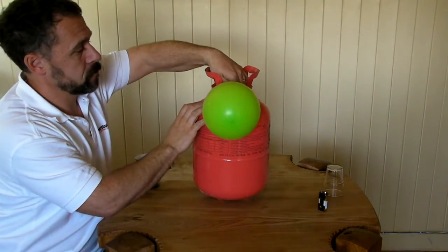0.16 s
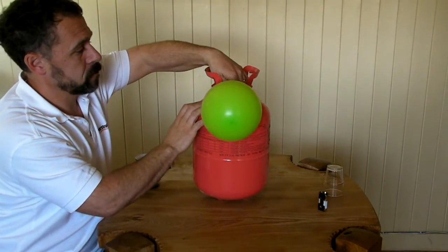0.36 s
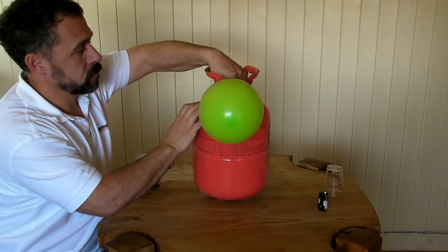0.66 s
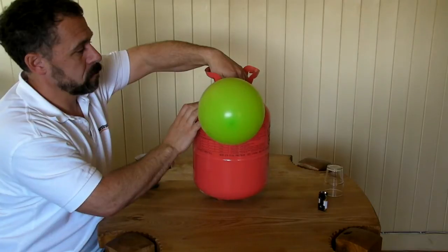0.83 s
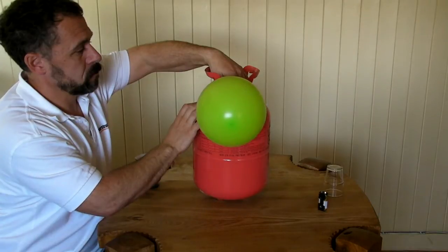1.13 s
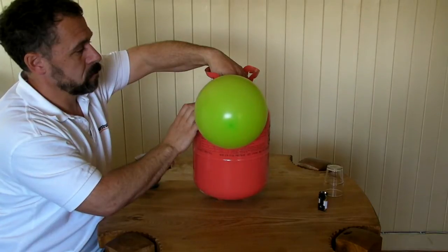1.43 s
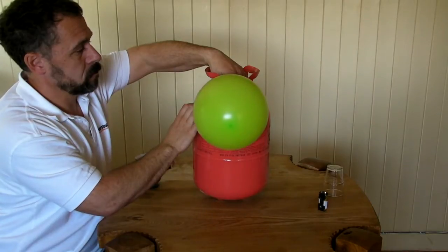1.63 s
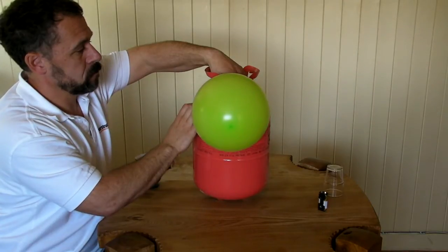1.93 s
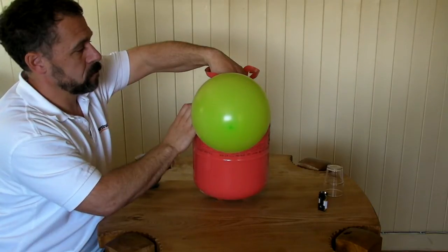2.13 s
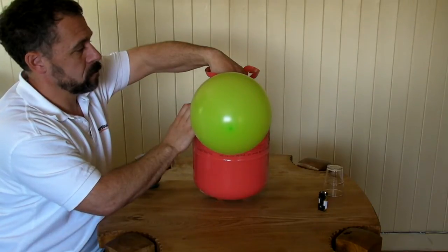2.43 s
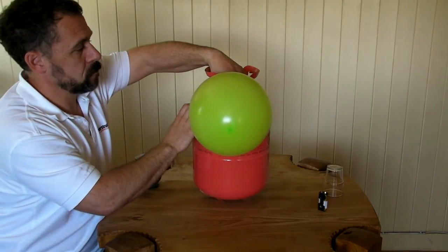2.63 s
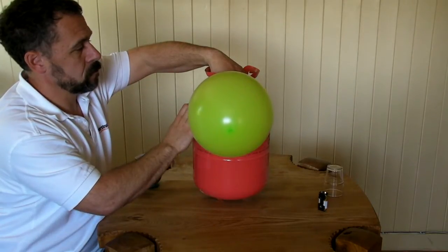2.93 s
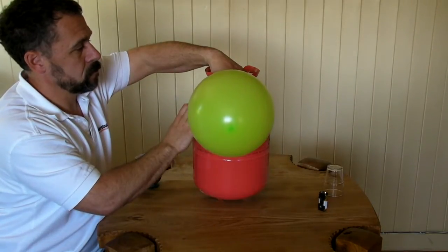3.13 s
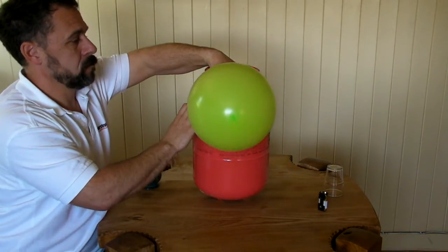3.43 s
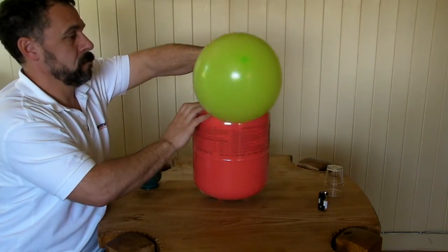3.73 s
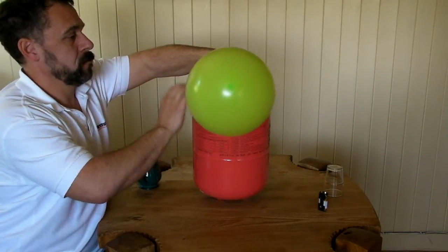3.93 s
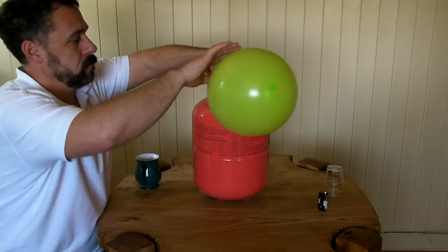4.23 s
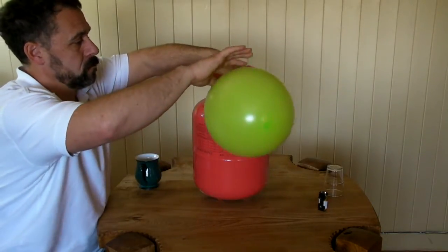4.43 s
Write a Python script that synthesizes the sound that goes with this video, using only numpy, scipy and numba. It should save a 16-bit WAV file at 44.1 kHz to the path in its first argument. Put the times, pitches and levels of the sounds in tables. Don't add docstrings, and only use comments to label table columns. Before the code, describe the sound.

In a small panelled room, a canister blows gas into a balloon: a loud, bright hiss with a thin high whistle, its tones sinking and softening as the balloon swells. Low skin flutter and canister rumble run beneath. The valve closes, leaving quiet device hiss, tiny ticks and finger taps, then two brief latex rubs and a new burst of gas at the end. Stereo pocket camera about two metres away.

```python
import sys
import numpy as np
from scipy import signal
from scipy.fft import rfft, irfft
from scipy.io import wavfile
from scipy.ndimage import uniform_filter1d
from numba import njit

SR = 44100
rng = np.random.default_rng(int(sys.argv[2]) if len(sys.argv) > 2 else 0)


def inscribe(sig):
    pcm = np.round(np.clip(np.atleast_2d(sig).T, -1, 1) * 32767)
    wavfile.write(sys.argv[1], SR, pcm.astype(np.int16))


def invert_db(x):
    u = np.asarray(x, float) / 20
    return 10 ** u


N = 202307
TIME = np.arange(N) / SR
FREQ = np.arange(N // 2 + 1) * SR / N + 1e-9

# time in seconds, jet level in dB.
VALVE_OPEN = [
    [(0.0, -23), (0.45, -26), (0.8, -24.5), (1.3, -26.5), (1.8, -28), (2.3, -31), (2.7, -32), (3.4, -32.5),
     (3.6, -36), (3.67, -41.5), (3.75, -54.5), (3.84, -93), (3.9, -100)],
    [(4.45, -101), (4.49, -65), (4.546, -49.5), (4.59, -36.5)],
]
FULL_FLOW_DB = -30


def unit(x):
    return x / np.sqrt(np.mean(x ** 2))


def noise():
    return rng.standard_normal(N)


def colour(x, points):
    hz, db = np.transpose(points)
    gain = invert_db(np.interp(np.log(FREQ), np.log(hz), db))
    return irfft(rfft(x) * gain, N)


@njit
def svf(x, hz, width):
    out, band, low = np.empty(len(x)), 0., 0.
    for i in range(len(x)):
        g, k = np.tan(np.pi * hz[i] / SR), width[i] / hz[i]
        v = (band + g * (x[i] - low)) / (1 + g * (g + k))
        band, low = 2 * v - band, low + 2 * g * v
        out[i] = k * v
    return out


def ring(x, modes, scale=1., blur=1.):
    one = np.ones(N)
    out = np.zeros(N)
    for hz, width, db in modes:
        centre = np.minimum(one * hz * scale, .45 * SR)
        out += invert_db(db) * svf(x, centre, one * width * blur)
    return out


def walk(rate):
    k = int(SR / rate)
    steps = np.repeat(rng.standard_normal(N // k + 1), k)
    return unit(uniform_filter1d(uniform_filter1d(steps, k), k)[:N])


def bumps(rows):
    return sum(db * np.exp(-(2 * (TIME - s) / length) ** 2) for s, length, db in rows)


def valve_flow():
    out = np.full(N, -120.)
    for rows in map(np.array, VALVE_OPEN):
        on = (TIME >= rows[0, 0]) & (TIME <= rows[-1, 0])
        out[on] = np.interp(TIME[on], rows[:, 0], rows[:, 1])
    return out


def valve_jet():
    # frequency in Hz, level in dB per Hz.
    jet_colour = [(330, -29.5), (560, -4), (793, -7.5), (886, -2), (1090, -3.5), (1500, -3), (1570, -1.5),
                  (2510, -4), (2850, -3.5), (3400, -6.5), (4300, -6.5), (6030, -5), (7960, -9),
                  (8420, -6.5), (10800, -1), (12300, -6.5), (15500, -14.5)]
    return unit(colour(noise(), jet_colour)) * invert_db(valve_flow() - 1.5 + 0.21 * walk(11.0))


def throat_whistle():
    # frequency in Hz, width in Hz, level in dB.
    throat_modes = [(10800, 1900, 0), (10200, 250, -7), (10620, 300, -5)]
    blow_db = -29.5 + 0.54 * (valve_flow() - FULL_FLOW_DB)
    throat = ring(noise(), throat_modes, 1 + .004 * walk(6))
    whistle = unit(ring(throat, throat_modes[:1])) * invert_db(blow_db - 6.5 + .9 * walk(8))
    spurt_s, spurt_length_s, spurt_hz, spurt_db = 2.495, 0.059, 10700, -31.5
    bell = np.exp(-(2 * (TIME - spurt_s) / spurt_length_s) ** 2)
    spurt = unit(ring(throat, [(spurt_hz, 200, 0)])) * invert_db(spurt_db) * bell
    return whistle, spurt


def gas_ball(jet, whistle):
    # frequency in Hz, width in Hz, level in dB,
    # extra pitch change per second once the ball lengthens.
    ball_modes = [(4300, 560, 3.5, -.02), (6300, 560, -.5, -.02), (8320, 420, 4, -.038),
                  (10040, 430, 3.5, -.034), (11350, 450, 1, -.004), (12850, 650, -3, 0),
                  (14500, 650, -2, -.01), (16000, 500, -1, 0), (17600, 600, -2, 0), (19300, 700, -3, 0),
                  (20900, 800, -3, 0), (22500, 900, -3, 0)]
    # frequency in Hz, level in dB.
    breathing = [(2000, 0.5), (3000, -1.5), (3900, 3.5), (4600, -4.5), (5200, -4.5), (7000, -12)]
    # frequency in Hz, width in Hz, level
    # in dB.
    nozzle_modes = [(2560, 600, -2), (4480, 220, -6)]
    # frequency at the start in Hz, width in Hz, depth from 0 to 1.
    troughs = [(5740, 320, 0.4), (9400, 610, 0.4), (11800, 980, 0.8), (13600, 500, .5), (15600, 500, .5),
               (17100, 600, .5), (18700, 600, .4)]

    fill_per_s, emptying_s = .79, 5.
    volume = 1 + fill_per_s * emptying_s * (1 - np.exp(-TIME / emptying_s))
    shrink = volume ** (-1 / 3)
    scale = shrink * (1 + 0.004 * walk(5.5))
    blur = shrink * (1 + 0.39 * TIME)

    def swelling_ring(x, rows, since):
        out = np.zeros(N)
        for hz, width, db, sinking in rows:
            lengthened = 1 + sinking * np.maximum(TIME - since, 0)
            out += ring(x, [(hz, width, db)], scale * lengthened, blur) * invert_db(1.4 * walk(5))
        return out

    pear_s = .8
    source = jet + whistle
    first = swelling_ring(jet, ball_modes[:1], pear_s) * invert_db(-5 * TIME - 2.0)
    second = swelling_ring(source, ball_modes[1:2], 0.)
    upper = swelling_ring(source, ball_modes[2:], pear_s) * invert_db(-2 * TIME)

    leak = invert_db(np.minimum(-16 + 7 * TIME, -3.5))
    nozzle = ring(jet, nozzle_modes) * np.clip(TIME / 2.24, 0, 1) ** 2
    below = invert_db(-3.5) * colour(jet, breathing)
    rush = first + second + upper + leak * (source + nozzle) + below
    for centre, width, depth in troughs:
        rush = rush - depth * np.exp(-TIME / .8) * ring(rush, [(centre, width, 0)], scale)
    return rush


def balloon_skin():
    # frequency in Hz, width in Hz, level in dB.
    skin_modes = [(235, 36, -1.5), (327.5, 38, 0.5)]
    # time in seconds, pitch in Hz, level in dB.
    drone_path = [(0, 370, 0.5), (.25, 363, -2), (.55, 363, 0.5), (.9, 379, 1.5), (1.05, 430, -1),
                  (1.4, 440, -2), (1.95, 430, -1.5), (2.08, 516, -1), (2.4, 535, 4), (2.55, 425, -3.5),
                  (4.59, 356, -1)]
    # time in seconds, length in seconds, strength in dB.
    shudders = [(0.12, .08, 7), (0.3, 0.12, 8.5), (0.46, 0.14, 3.5), (0.6, 0.12, 7), (0.83, 0.067, 6.5),
                (0.95, 0.039, 13), (1.06, 0.05, 9.5), (1.36, 0.22, 8), (1.5, 0.15, 6.5), (1.68, 0.079, 13),
                (1.84, 0.13, 9), (2.11, 0.033, 17), (2.22, 0.11, 17.5), (2.42, 0.051, 8), (2.68, 0.048, 4),
                (2.86, 0.058, 20), (3.12, 0.12, 11), (3.24, 0.12, 15), (3.43, 0.066, 17)]
    skin_db = valve_flow() - FULL_FLOW_DB - 3 * TIME
    shudder = bumps(shudders)
    hum = unit(ring(ring(noise(), skin_modes), skin_modes))
    hum = hum * invert_db(-58.5 + skin_db + shudder + 1.8 * walk(9.14))

    s, pitch, strength = np.transpose(drone_path)
    hz = np.interp(TIME, s, pitch)
    swell = np.interp(TIME, s, strength)
    drone = unit(svf(svf(noise(), hz, 0.13 * hz), hz, 1.5 * hz))
    drone_db = -49.5 + swell + skin_db + 2 * TIME + 0.5 * shudder + 1.5 * walk(8.6)
    return hum + drone * invert_db(drone_db)


def gas():
    jet = valve_jet()
    whistle, spurt = throat_whistle()
    return gas_ball(jet, whistle) + balloon_skin() + spurt


def camera_hiss():
    # frequency in Hz, level in dB per Hz.
    hiss_colour = [(18, -50), (45, -26), (140, -0.5), (341, 3.5), (450, 2.5), (656, 2), (1230, -0.5),
                   (2130, -2), (4300, -3), (4480, -7.5), (7860, -14), (9190, -13.5), (15500, -19)]
    shared, left, right = (unit(colour(noise(), hiss_colour)) for _ in range(3))
    duck_db = -8 * np.clip((valve_flow() + 52) / 15, 0, 1)
    return (0.59 * shared + np.array([left, right])) * invert_db(-48.5 - 2.5 + duck_db)


def rumble():
    # time in seconds, length in seconds,
    # level in dB.
    neck_shifts = [(.1, .1, -3), (.27, .08, -2), (.45, .14, 8), (.68, .12, 7), (.85, .06, 3), (1.22, .06, 5),
                   (1.4, 0.12, 8), (1.57, .06, 5), (1.68, 0.054, 5), (1.83, 0.16, 9), (2.17, 0.11, 11.5),
                   (2.4, .05, 6), (2.6, .06, -2), (2.85, .05, 18), (3.1, .08, 0), (3.22, .07, 20),
                   (3.45, 0.11, 8)]
    # time in seconds, length in seconds, level in dB.
    grips = [(3.72, .1, 7), (3.85, 0.086, 6), (4.02, .1, 10), (4.13, .03, 4), (4.25, 0.11, 15),
             (4.5, 0.19, 20)]
    flow = valve_flow()
    canister_db = -68 + flow - FULL_FLOW_DB - 3.5 * TIME + bumps(neck_shifts)
    gas_off = np.clip((-36 - flow) / 5, 0, 1)
    shake = invert_db(canister_db) + invert_db(-72.5 + bumps(grips)) * gas_off
    low = [(20, -32), (50, -12), (100, 7.5), (170, 0.0), (260, -28.5)]  # (Hz, dB)
    shared, apart = (unit(colour(noise(), low)) for _ in range(2))
    return (shared + 0.43 * np.outer([1, -1], apart)) * shake * invert_db(1.8 * walk(26))


def taps():
    # time in seconds, level in dB, pitch in Hz, decay in seconds.
    contacts = [(3.668, -53, 170, .012), (3.828, -55, 430, .045), (4.0, -57, 610, .035),
                (4.008, -52, 170, .012), (4.212, -50, 68, .04), (4.22, -39, 383, .006),
                (4.225, -41, 683, .013), (4.228, -44, 1034, .01), (4.234, -42, 912, .009),
                (4.238, -44, 530, .016), (4.262, -50, 1400, .015), (4.3, -60, 101, .035),
                (4.45, -52, 113, .02), (4.473, -48, 900, .016), (4.479, -48, 690, .015),
                (4.486, -46, 900, .012), (4.497, -42, 209, .035), (4.5, -49, 775, .022),
                (4.512, -49, 2050, .01), (4.549, -54, 217, .04), (4.56, -50, 1750, .014),
                (4.565, -49, 900, .016), (4.572, -49, 1250, .012)]
    out = np.zeros(N)
    for s, db, hz, decay in contacts:
        start = int(s * SR)
        t = TIME[start:] - start / SR
        envelope = np.exp(-t / decay) * (1 - np.exp(-t / 0.00059))
        out[start:] += invert_db(db) * np.sin(2 * np.pi * hz * t) * envelope
    return out


def camera_ticks():
    # time in seconds, width in milliseconds.
    ticks = [(3.6776, 1.3), (3.7018, 2.2), (3.7153, 1.1), (3.7362, 2.3), (3.7643, 1.7), (3.7792, 1.3),
             (3.7985, 1.2), (3.8282, 2.2), (3.8377, 2.0), (3.8467, 2.0), (3.8635, 2.0), (3.8863, 1.3),
             (3.8957, 1.6), (3.9073, 2.6), (3.9385, 1.3), (3.9845, 1.9), (4.0151, 2.8), (4.03, 1.4),
             (4.0555, 1.5), (4.0667, 2.7), (4.1328, 1.5), (4.2107, 2.6), (4.3168, 3.0), (4.3254, 2.4),
             (4.3455, 2.3), (4.3779, 2.7), (4.4029, 2.3), (4.4129, 1.9), (4.4532, 2.4), (4.4586, 2.3)]
    pushes = sum(np.exp(-(1.7 * (TIME - s) / (ms / 1000)) ** 2) for s, ms in ticks)
    high_pass = signal.butter(1, 60, "high", fs=SR, output="sos")
    return signal.sosfilt(high_pass, invert_db(-45.5) * pushes)


def rubs():
    # start in seconds, hold in seconds, level in dB.
    strokes = [
        (4.225, 0.045, -41.5),
        (4.283, 0.03, -55),
        (4.476, 0.048, -43.5),
        (4.564, .06, -47),
    ]
    # frequency in Hz, width in Hz, level in dB.
    latex_modes = [(670, 74, 7), (1030, 230, 3), (440, 790, 12), (1470, 510, 5), (2190, 500, 1),
                   (3720, 460, -6)]
    attack_s, sag_db_per_s, release_db_per_s = 0.0065, -94, -330
    landing_db, sliding_db, brighten_s = -16, -9, .02
    body, top = np.zeros(N), np.zeros(N)
    for s, hold, db in strokes:
        t = TIME - s
        shape_db = sag_db_per_s * np.clip(t, 0, hold) + release_db_per_s * np.maximum(t - hold, 0)
        gain = invert_db(db + shape_db) * np.exp(np.minimum(t / attack_s, 0) * 2)
        body += gain
        top += gain * invert_db(landing_db + (sliding_db - landing_db) * np.clip(t / brighten_s, 0, 1))
    slips = noise() * invert_db(2.5 * walk(250))
    scrape = ring(ring(slips, [(5170, 4500, 0)]), [(5000, 6000, 0)])
    return unit(ring(slips, latex_modes)) * body + unit(scrape) * invert_db(-22.0) * top


def room(x):
    # frequency in Hz, width in Hz, boost in dB.
    standing_waves = [(236, 20, 2), (365, 20, 2), (426, 25, 4), (528, 22, 6), (672, 30, 4), (742, 20, 4),
                      (803, 20, 4), (880, 40, 2), (1204, 15, 4.5), (1328, 18, 4.5), (1470, 30, 6),
                      (1680, 50, 5), (1935, 40, 4), (2122, 28, 5), (2242, 18, 9), (2415, 20, 4),
                      (2494, 28, 7), (2606, 16, 7), (2674, 14, 6), (3571, 40, 3), (4480, 90, 5),
                      (5070, 90, 4), (5330, 45, 3), (5780, 80, 3), (6020, 80, 3), (6860, 60, 4),
                      (7450, 90, 3), (8570, 150, 3), (10190, 40, 4), (10613, 40, 4), (11700, 120, 3)]
    # frequency in Hz, level in dB.
    panels = [(200, 0), (3000, 1), (8000, -0.5), (15000, -7.5)]
    # frequency in Hz, side minus mid in dB.
    port_spread = [(60, -5), (110, -7), (200, -13), (380, -19.5), (700, -17), (1290, -22), (2380, -13),
                   (4400, -14.5), (8120, -8), (15000, -3)]
    t60_s, echo_db = .3, -5
    t = TIME[:int(.6 * SR)]
    tails = rng.standard_normal((2, len(t))) * invert_db(-60 * t / t60_s) * (t > .004)
    tails /= np.sqrt(np.sum(tails ** 2, axis=1, keepdims=True))
    boost = 1
    for hz, width, db in standing_waves:
        boost = boost + (invert_db(db) - 1) / (1 + 1j * (FREQ ** 2 - hz ** 2) / (FREQ * width))
    x = irfft(rfft(x) * boost, N)
    tail, across = (signal.fftconvolve(x, h)[:N] for h in tails)
    mid = (x + invert_db(echo_db) * colour(tail, panels)) / np.sqrt(1 + invert_db(2 * echo_db))
    side = colour(across, port_spread)
    return np.array([mid + side, mid - side])


def scene():
    air = room(gas() + taps() + rubs())
    notch_hz, notch_width_hz = 7900, 220
    b, a = signal.iirnotch(notch_hz, notch_hz / notch_width_hz, fs=SR)
    return signal.filtfilt(b, a, air) + camera_hiss() + rumble() + camera_ticks()


def band_limit(x):
    return signal.sosfilt(signal.butter(12, 15860, fs=SR, output="sos"), x)


def record(dry):
    return band_limit(dry)


dry = scene()
out = record(dry)
inscribe(out)
```